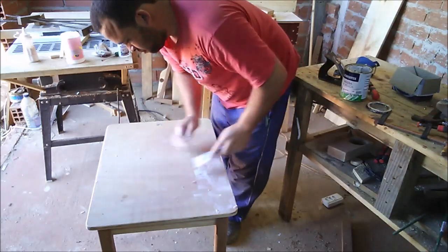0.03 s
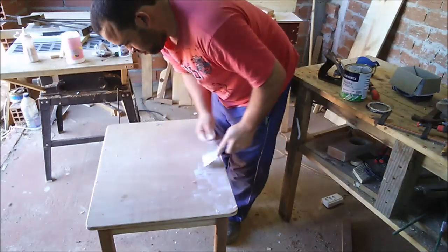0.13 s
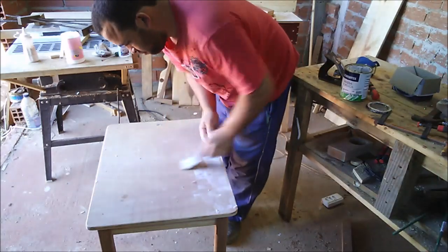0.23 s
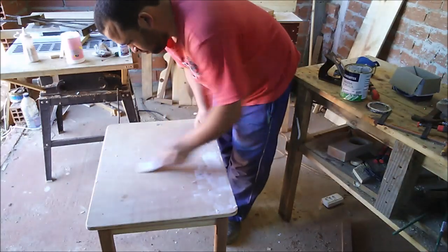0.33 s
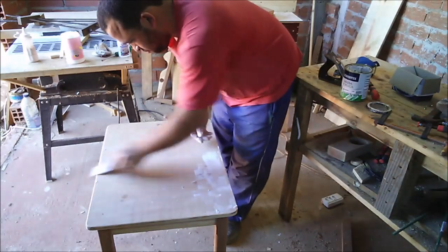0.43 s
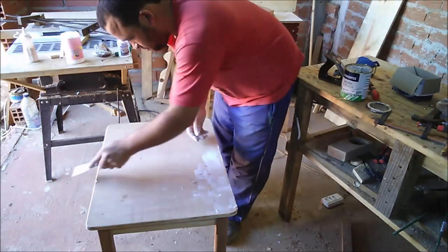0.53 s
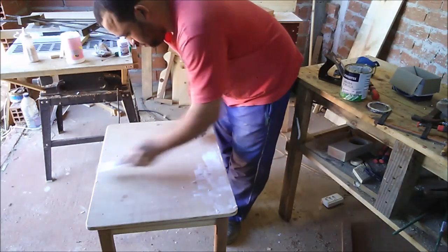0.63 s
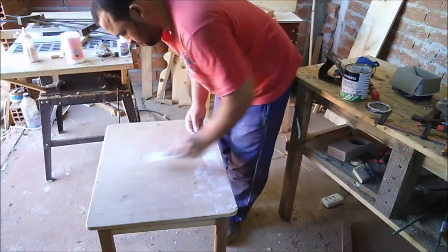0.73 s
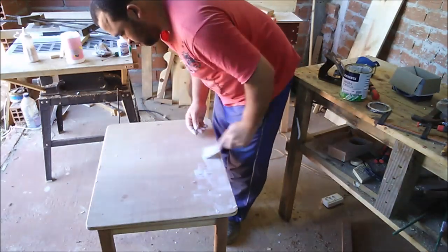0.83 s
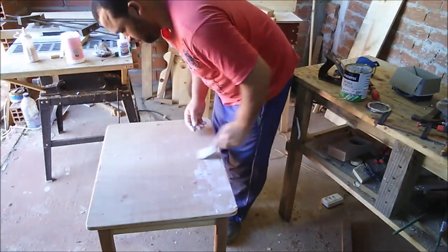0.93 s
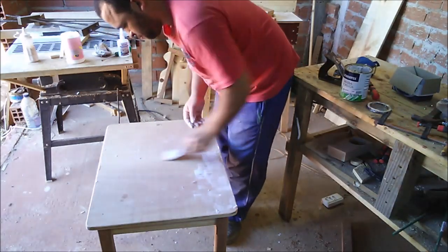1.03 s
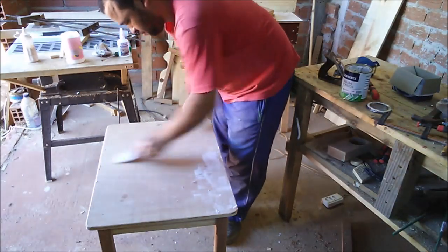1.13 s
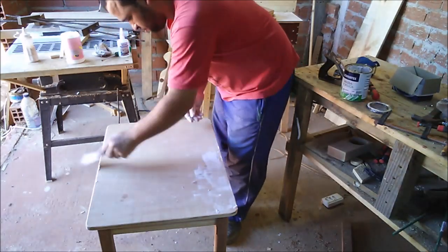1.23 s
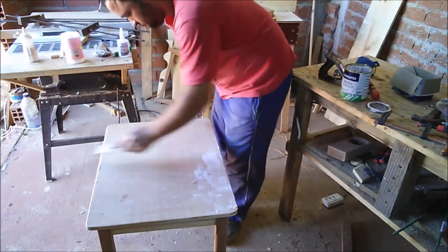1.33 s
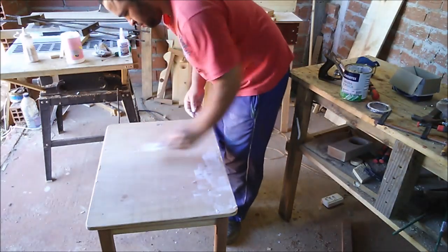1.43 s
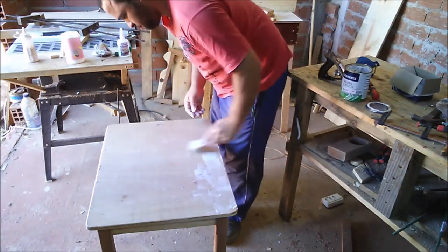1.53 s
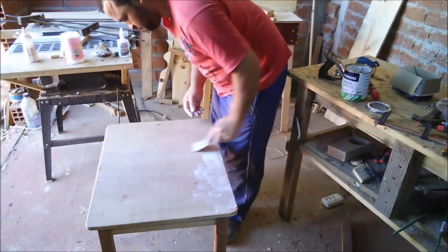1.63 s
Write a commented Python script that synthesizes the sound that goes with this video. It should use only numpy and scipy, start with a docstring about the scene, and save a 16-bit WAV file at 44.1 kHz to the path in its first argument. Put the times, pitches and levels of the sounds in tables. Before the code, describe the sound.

Two gritty sanding strokes on wood, about three quarters of a second apart, swell and brighten, then stop abruptly; a faint swish between them, light woody thumps, short room echo, barely audible distant chirps, one mono microphone.

```python
"""Sandpaper is swept twice across a wooden table top in a small brick workshop: noise and dense grit grains,
with a hiss and a whistle that rise with hand speed. Soft knocks of scuffing noise mark the hand landing and
leaving; rubbing, knocks and pushes ring the modes of the top. A faint swish falls between the strokes.
Gliding sines make faint far-off hoots and chirps over a murmur of shaped noise.
A decaying noise tail makes the room; a mono recorder turns down the quietest bands."""
import sys
import numpy as np
from scipy import signal
from scipy.fft import rfft, irfft, next_fast_len
from scipy.io import wavfile
from scipy.ndimage import uniform_filter1d, map_coordinates

SR = 44100
rng = np.random.default_rng(int(sys.argv[2]) if len(sys.argv) > 2 else 0)


def store_pcm(level_fs):
    """Save levels as 16-bit WAV."""
    pcm = np.round(np.clip(level_fs, -1, 1) * 32767).astype(np.int16)
    wavfile.write(sys.argv[1], SR, np.atleast_2d(pcm).T)


N = 74970
LEAD = SR // 3  # samples run before the start, so that earlier sounds are already ringing
T = np.arange(-LEAD, N) / SR

# steady murmur of outdoor air and distant traffic, relative spectrum: frequency_hz, level_db
MURMUR_SPECTRUM = [(25, -41.5), (70, -18.5), (150, -24.5), (250, -5.5), (560, -1), (1100, -21.5),
                   (2200, -34.5), (4000, -18), (8000, -28.5), (15000, -38)]
MURMUR_DB = -64

# path of each rub, grit pitch following hand speed: time_s, pitch_hz, level_db
EARLIER_STROKE = [(-.3, 4040, -26.5), (-.11, 4210, -28.5), (-.045, 3100, -69.5)]
FIRST_STROKE = [(0.217, 1610, -50.5), (0.232, 2050, -29), (.28, 2950, -29), (.326, 4000, -27.5),
                (0.366, 4590, -29), (.398, 4560, -25.5), (.44, 5050, -28), (0.478, 4675, -26),
                (.495, 3560, -32.5), (0.561, 3100, -52.5)]
RETURN_SWISH = [(.6, 4000, -60.5), (.66, 4280, -57), (0.712, 4280, -57.5), (0.778, 3960, -72.5)]
SECOND_STROKE = [(0.938, 5582, -53), (.97, 3720, -48.5), (0.993, 3123, -34), (1.05, 3075, -33),
                 (1.128, 4562, -26.5), (1.214, 4830, -25.5), (1.242, 4980, -28.5), (1.271, 4250, -26),
                 (1.297, 3255, -37), (1.42, 3465, -59)]
NEXT_STROKE = [(1.679, 1640, -58.5), (1.705, 1800, -46.5)]
# relative scrape spectrum at the reference speed: frequency_hz, level_db
SCRAPE_SPECTRUM = [(100, -36.5), (180, -27), (260, -21), (600, -12), (1100, -5.5), (2600, -1.5), (4000, 2),
                   (5800, 0.5), (7200, -7.5), (8500, -14), (12500, -27.5), (15500, -30.5)]
# brightening is in dB per octave of frequency, for each doubling of speed
REFERENCE_HZ, PIVOT_HZ, BRIGHTEN_DB = 3990, 2600, 6
ZIP_DB, ZIP_OCTAVES = 3, 0.096  # narrow lift of the hiss at the grit pitch
GRAINS_PER_S, GRAIN_DB = 2500, -7  # grain level is relative to the smooth noise
CHATTER_DB, CHATTER_PER_S = 1.0, 180  # fast random unevenness of pressure
WHISTLE_KNOTS_PER_S = 240  # sets the width of the narrow band in which evenly spaced grit sings
WHISTLE_BEST_HZ, WHISTLE_OCTAVES = 3600, 0.44  # the paper sings most readily around this pitch

# modes of the table top, hand at the near side or far edge: frequency_hz, near_db, edge_db, t60_s
TABLE_MODES = [(477, -2, -27.5, 0.29), (615.2, -4.5, 7.5, 0.24), (725, -8.5, -11.5, 0.39),
               (823, 2, -4, 0.46), (977, -2, -3, 0.27), (1016, -8.5, -2.5, 0.39), (1082, -1, -5.5, 0.48),
               (1109, 7.5, -11.5, 0.28), (1429, 2, -1, 0.2), (2262, -19.5, -8.5, 0.047),
               (2500, -18.5, -0.5, 0.05)]
RING_DB = 10  # added to every mode level
RUMBLE_CUT_HZ = 224
# hand position, from near side 0 to far edge 1: time_s, reach_fraction
HAND_REACH = [(.25, 0.35), (.47, 1), (.65, 0.87), (1, 0), (1.26, 1)]
# weight of the hand coming on or off the top: time_s, force_db
HAND_PUSHES = [(.229, -22.5), (.49, -21), (.992, -14.5), (1.277, -22.5)]
PUSH_S = 0.00018  # standard deviation of each bell-shaped push

# decay of the room tail: frequency_hz, t60_s
ROOM_DECAY = [(200, 0.1), (1000, 0.78), (4000, 0.46), (8000, 0.35), (14000, 0.35)]
ROOM_DB, EARLY_DB, EARLY_T60_S = -6.5, -13.5, 0.24

# distant hoots and chirps, pitch at mid-call:
# start_s, length_s, pitch_hz, glide_hz_per_s, level_db, blur_rad
DISTANT_CALLS = [(-.04, 0.12, 541, 9, -57.5, 0.39), (.07, 0.067, 579, -200, -56, 0.96),
                 (0.659, 0.18, 1051, -100, -66, 1.17), (0.893, 0.14, 553, -64, -54, 0.31),
                 (1.455, 0.18, 781, -550, -65, 1.12), (0.134, 0.066, 3970, 0, -72.5, 1.9),
                 (0.155, 0.062, 4400, 2998, -68.5, 1.8), (.73, 0.071, 3600, -500, -68.5, 3.5),
                 (0.815, 0.14, 6070, -300, -75, 1.5), (0.887, 0.042, 4040, -500, -74, 1.7),
                 (1.38, 0.18, 4130, -2400, -62.5, 9.6), (1.519, 0.088, 3860, -400, -73, 1.16)]
CALL_WAVER_PER_S, CALL_SCATTER_PER_S = 66, 170  # slow and fast blur, knots a second
CALL_SCATTER = 0.095  # depth of the fast blur relative to the slow

# hand landing on the top or dropping off its edge: start_s, level_db, centre_hz, width_octaves, t60_s
HAND_KNOCKS = [(.14, -67.5, 1700, 0.056, 0.056), (0.218, -34.5, 1750, 0.15, 0.1),
               (0.225, -32.5, 283, 0.2, 0.09), (0.241, -37.5, 1150, 0.51, 0.36),
               (0.474, -31, 2340, 0.47, 0.22), (0.49, -39.5, 484, 1, 0.087), (.53, -45.5, 710, 0.035, 0.19),
               (.936, -54, 1130, 0.22, 0.28), (.938, -61.5, 10700, 0.82, 0.14),
               (0.986, -41, 227, 0.93, 0.12), (0.993, -42, 815, 1, 0.41), (1.279, -48.5, 600, 0.8, 0.48),
               (1.681, -54, 730, 0.39, 0.13)]
KNOCK_ATTACK_S = 0.0032

# narrow-band level below which the recorder turns the sound down: frequency_hz, level_db
QUIET_THRESHOLD = [(300, -78), (2200, -76.5), (6500, -84.5), (10000, -93.5), (15000, -102)]
SUPPRESS_DB = 12  # greatest cut
CUT_HZ = 15850  # upper band limit


def amp(db):
    """Decibels to gain."""
    return 10 ** (np.asarray(db) / 20)


def unit(x):
    """Scale to rms 1."""
    return x / np.sqrt(np.mean(x ** 2) + 1e-20)


def along(points, hz):
    """Read a curve of (Hz, value) points on a log-frequency axis."""
    f, v = np.transpose(points)
    return np.interp(np.log(hz + 1), np.log(f + 1), v)


def wobble(rate):
    """A smooth random curve, rate knots a second."""
    knots = rng.standard_normal(4096)
    return map_coordinates(knots, [(T - T[0]) * rate], mode="wrap")


def filtered(x, response):
    """Shape x by a response, given as a function of frequency."""
    m = next_fast_len(len(x) + SR // 2)
    spectrum = rfft(x, m) * response(np.fft.rfftfreq(m, 1 / SR))
    return irfft(spectrum, m)[:len(x)]


def bump(hz, centre, octaves):
    """A bell on the log-frequency axis."""
    return np.exp(-.5 * (np.log2((hz + 1) / centre) / octaves) ** 2)


def outdoors():
    """A steady, dull murmur of spectrally shaped noise."""
    murmur = filtered(rng.standard_normal(len(T)), lambda hz: amp(along(MURMUR_SPECTRUM, hz)))
    return amp(MURMUR_DB) * unit(murmur)


def stroke(rows, whistle_db):
    """Grit catches on the wood in dense grains; a faster hand gives a brighter hiss and higher, breathy whistle."""
    s, pitch, level = np.transpose(rows)
    catches = (rng.random(len(T)) < GRAINS_PER_S / SR) * rng.standard_normal(len(T))
    grit = unit(rng.standard_normal(len(T)) + amp(GRAIN_DB) * unit(catches))

    # the hiss changes colour with the hand speed but keeps its overall level
    hz, t, z = signal.stft(grit, SR, nperseg=512)
    hz = hz[:, None]
    rate = np.interp(t + T[0], s, pitch)
    speed_octaves = np.log2(rate / REFERENCE_HZ)
    tilt = BRIGHTEN_DB * speed_octaves * np.log2(np.clip(hz, 800, 7000) / PIVOT_HZ)
    colour = amp(along(SCRAPE_SPECTRUM, hz) + tilt + ZIP_DB * bump(hz, rate, ZIP_OCTAVES))
    colour = colour / np.sqrt(np.mean(colour ** 2, axis=0))
    hiss = signal.istft(z * colour, SR)[1][:len(T)]

    # two random envelopes on sine and cosine make a narrow noise band at the grit pitch
    passing = np.interp(T, s, pitch)
    phase = 2 * np.pi * np.cumsum(passing) / SR
    sine_part = wobble(WHISTLE_KNOTS_PER_S) * np.sin(phase)
    cosine_part = wobble(WHISTLE_KNOTS_PER_S) * np.cos(phase)
    whistle = unit(sine_part + cosine_part)
    singing = amp(whistle_db) * bump(passing, WHISTLE_BEST_HZ, WHISTLE_OCTAVES)

    pressure = amp(np.interp(T, s, level) + CHATTER_DB * wobble(CHATTER_PER_S))
    touching = (T > s[0]) * (T < s[-1])
    return (hiss + singing * whistle) * pressure * touching


def radiated(x):
    """The table gives off little bass."""
    highpass = signal.butter(4, RUMBLE_CUT_HZ, "high", fs=SR, output="sos")
    return signal.sosfilt(highpass, x)


def table_top(x):
    """Whatever rubs or pushes the top rings its modes; hand position decides how strongly each answers."""
    hz, near_db, edge_db, t60 = np.transpose(TABLE_MODES)[:, :, None]
    width = np.log(1000) / np.pi / t60  # resonance bandwidth in Hz

    def modes(db):
        return lambda f: np.sum(amp(db) * 1j * f * width / (hz * hz - f * f + 1j * f * width), axis=0)

    pushes = sum(amp(db) * np.exp(-.5 * ((T - s) / PUSH_S) ** 2) for s, db in HAND_PUSHES)
    force = radiated(x + pushes)
    reach = np.clip(np.interp(T, *np.transpose(HAND_REACH)), 0, 1)
    near = filtered(force * (1 - reach), modes(near_db))
    edge = filtered(force * reach, modes(edge_db))
    return amp(RING_DB) * (near + edge)


def workshop(x):
    """Near walls answer quickly with bright noise; a tail lingers longest in the midrange."""
    hz, t, z = signal.stft(rng.standard_normal(SR * 2 // 3), SR, nperseg=256)
    tail = signal.istft(z * amp(-60 * t / along(ROOM_DECAY, hz)[:, None]), SR)[1]
    age = np.arange(len(tail)) / SR
    early = rng.standard_normal(len(tail)) * amp(-60 * age / EARLY_T60_S) * (age > .003)
    answer = amp(ROOM_DB) * tail / np.linalg.norm(tail)
    answer = answer + amp(EARLY_DB) * early / np.linalg.norm(early)
    return x + signal.fftconvolve(x, answer)[:len(T)]


def distant_calls():
    """Faint hoots and chirps, probably birds: gliding sines, wavering and blurred by distance."""
    out = np.zeros(len(T))
    for s, length, hz, glide, db, blur in DISTANT_CALLS:
        u = T - s - length / 2  # time from mid-call
        waver = wobble(CALL_WAVER_PER_S) + CALL_SCATTER * wobble(CALL_SCATTER_PER_S)
        arch = np.maximum(1 - (2 * u / length) ** 2, 0)
        swell = arch * amp(2.56 * wobble(CALL_WAVER_PER_S))
        phase = 2 * np.pi * (hz * u + glide * u * u / 2) + blur * waver
        out += np.sqrt(2) * amp(db) * swell * np.sin(phase)
    return out


def knocks():
    """Soft blows of hand and paper on the top: scuffing noise bands that swell quickly and die away."""
    out = np.zeros(len(T))
    for s, db, centre, octaves, t60 in HAND_KNOCKS:
        age = np.maximum(T - s, 0)
        noise = rng.standard_normal(len(T))
        scuff = unit(filtered(noise, lambda hz: bump(hz, centre, octaves)))
        attack = 1 - np.exp(-age / KNOCK_ATTACK_S)
        out += scuff * amp(db - 60 * age / t60) * attack
    return out


def scene():
    """Strokes and knocks sound in the room and ring the table, over the background."""
    sanding = stroke(FIRST_STROKE, whistle_db=-8) + stroke(SECOND_STROKE, whistle_db=-12.0)
    for rows in (EARLIER_STROKE, RETURN_SWISH, NEXT_STROKE):
        sanding = sanding + stroke(rows, whistle_db=-19.0)
    contact = sanding + knocks()
    table = workshop(radiated(contact)) + table_top(contact)
    mono = amp(-2.5) * table + distant_calls() + outdoors()
    return np.array([mono[LEAD:]] * 2)


def record(dry):
    """One microphone on both channels; a suppressor turns down quiet bands, and a band limit cuts the top."""
    hz, t, z = signal.stft(dry[0], SR, nperseg=512)
    # power averaged over neighbouring bands, then over neighbouring moments
    power = uniform_filter1d(np.abs(z) ** 2, size=5, axis=0)
    power = np.abs(uniform_filter1d(power, size=5, axis=1))
    threshold = amp(along(QUIET_THRESHOLD, hz)[:, None]) ** 2
    quiet = 1 / (1 + (power / threshold) ** 2)  # near 1 well below the threshold, near 0 above
    clean = signal.istft(z * amp(-SUPPRESS_DB * quiet), SR)[1][:N]
    return np.array([filtered(clean, lambda hz: hz < CUT_HZ)] * 2)


dry = scene()
out = record(dry)
store_pcm(out)
```